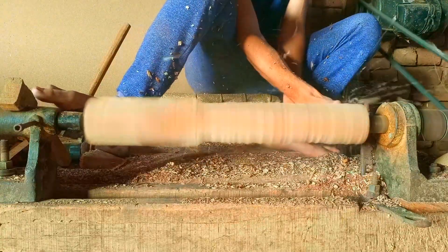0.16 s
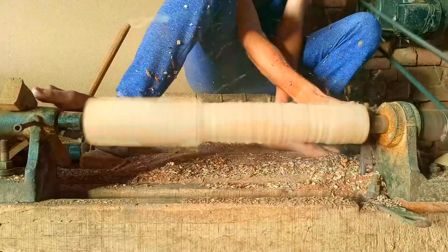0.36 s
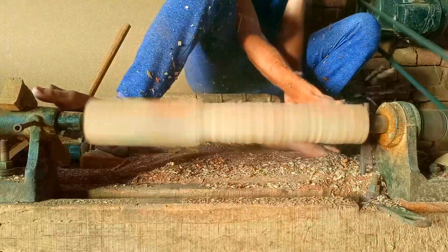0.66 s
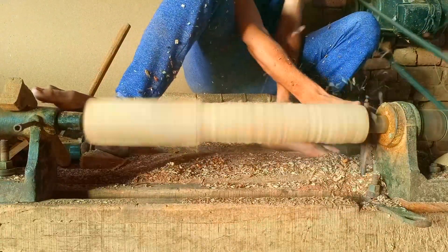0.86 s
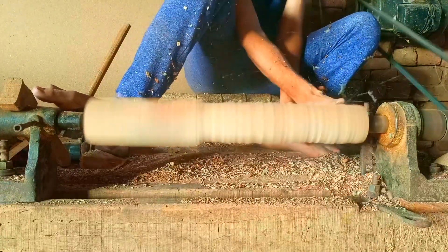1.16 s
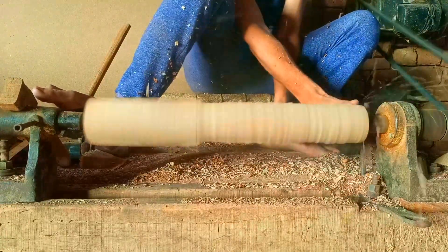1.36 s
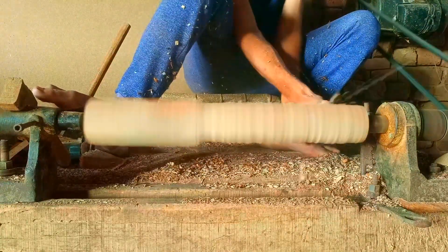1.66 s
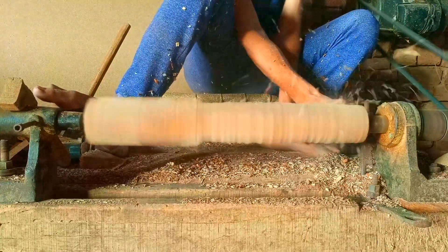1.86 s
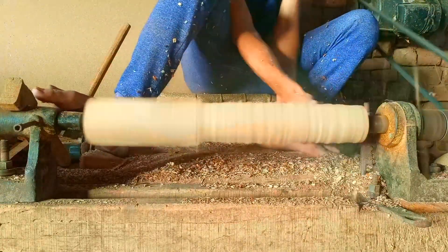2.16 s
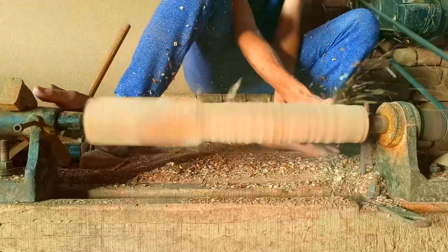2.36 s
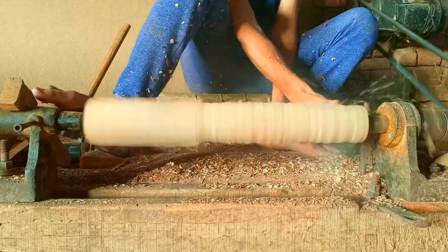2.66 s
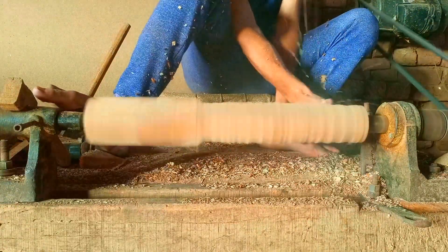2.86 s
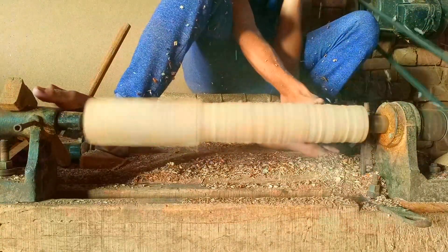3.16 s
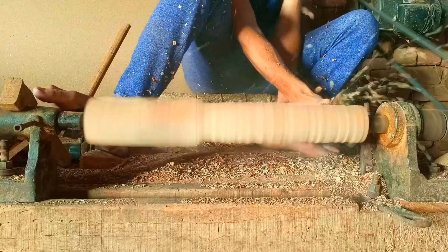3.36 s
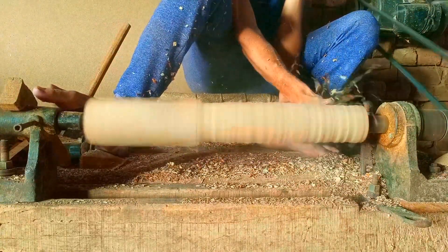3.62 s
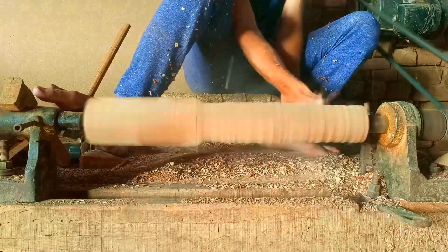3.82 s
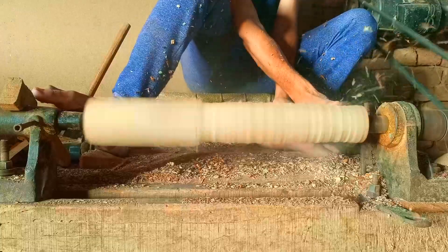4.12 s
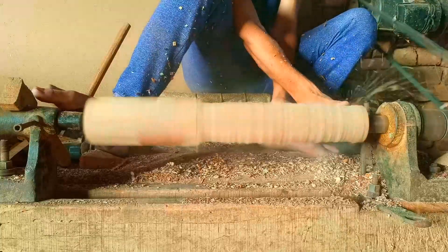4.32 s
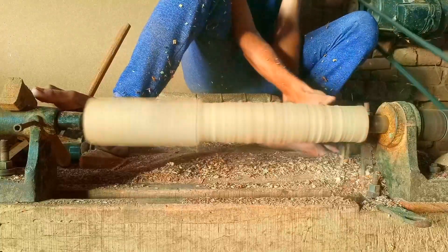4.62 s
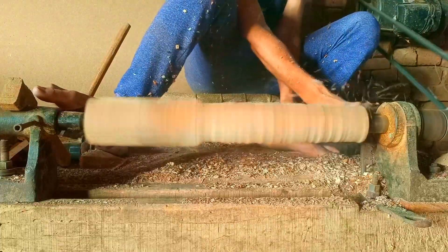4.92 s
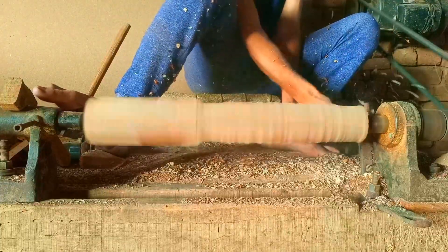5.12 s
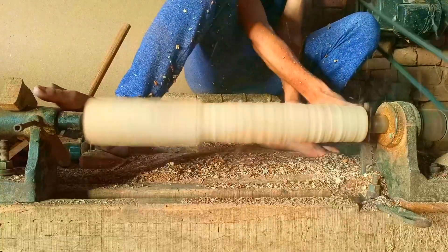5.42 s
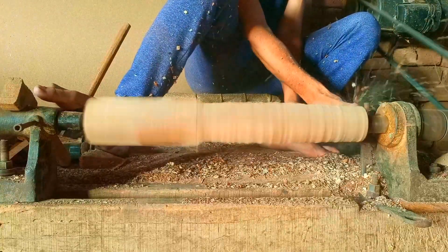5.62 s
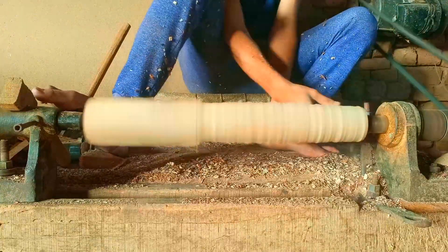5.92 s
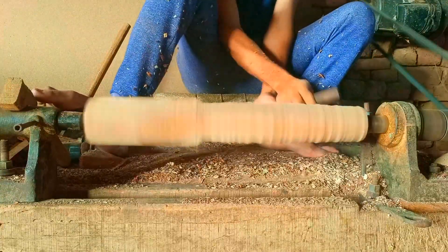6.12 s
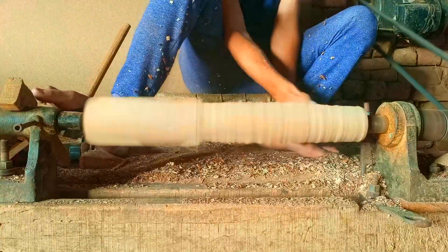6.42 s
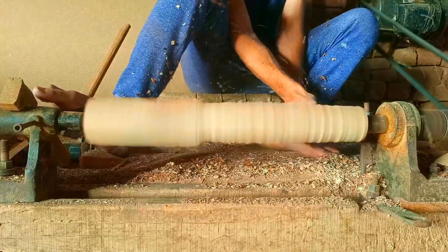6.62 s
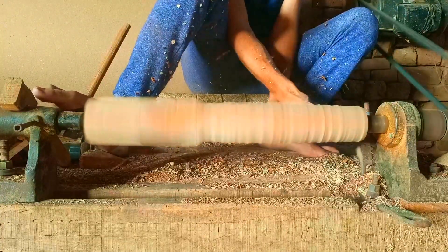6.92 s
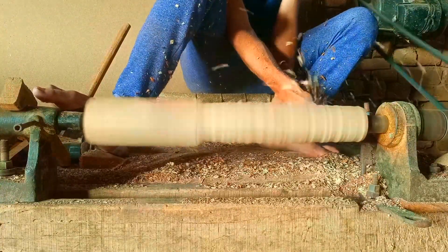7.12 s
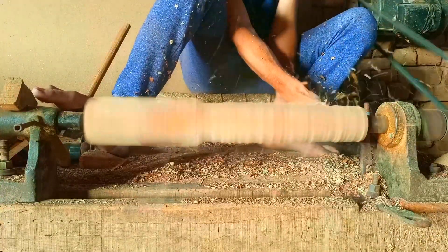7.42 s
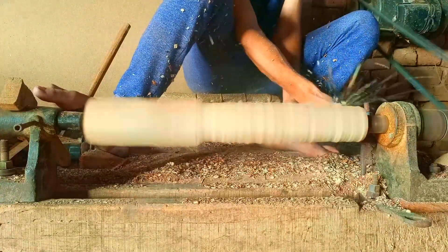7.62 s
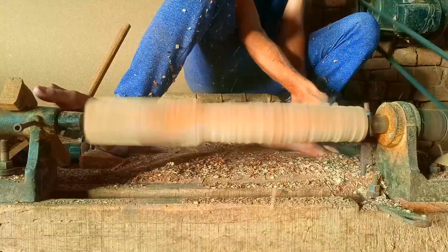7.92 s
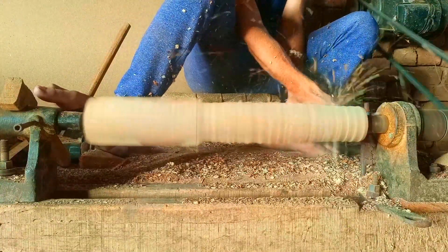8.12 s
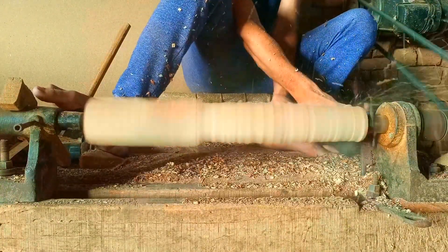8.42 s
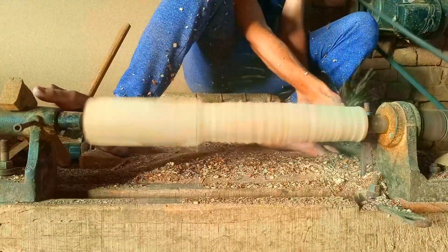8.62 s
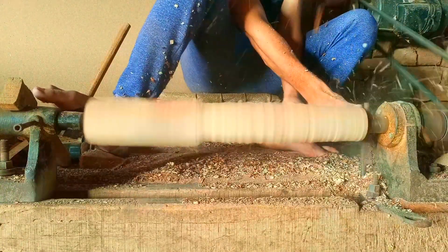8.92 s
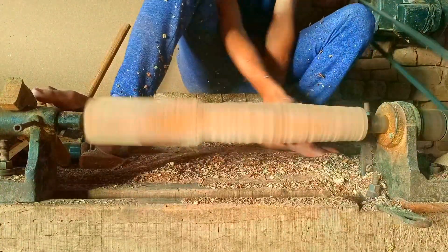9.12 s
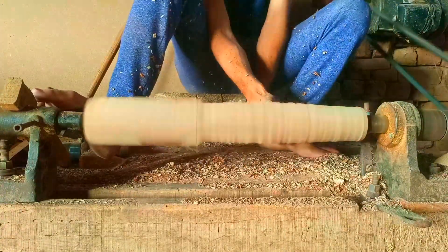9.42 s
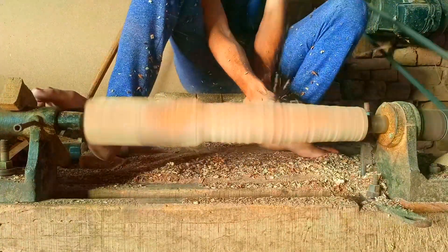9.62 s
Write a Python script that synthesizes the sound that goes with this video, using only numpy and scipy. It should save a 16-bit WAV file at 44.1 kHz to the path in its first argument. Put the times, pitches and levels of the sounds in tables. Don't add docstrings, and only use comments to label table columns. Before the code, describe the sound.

Harsh, fluttering scrapes of a turning tool tear wood on a running lathe, broken by brief pauses of motor hum and bearing ticks.

```python
import sys
import numpy as np
from scipy import signal
from scipy.io import wavfile

SR = 44100
rng = np.random.default_rng(int(sys.argv[2]) if len(sys.argv) > 2 else 0)


def put_to_file(sound):
    columns = np.atleast_2d(sound).T
    safe = np.clip(columns, -1, 1)
    whole_steps = np.round(safe * 32767)
    wavfile.write(sys.argv[1], SR, whole_steps.astype(np.int16))


def level_to_linear(level):
    exponent = np.asarray(level, float) / 20
    return 10 ** exponent


N = 430857

# edge touches t/s, entry force level/dB, cutting time/s, end force level/dB, lifting time/s
STROKES = [(0.092, -36, 0.25, -31, 0.15), (0.581, -32, 0.29, -26, 0.027), (0.966, -27.5, 0.012, -31, 0.025),
           (1.14, -30, 0.22, -36.5, 0.055), (1.712, -34, 0.3, -27, 0.1), (2.279, -33, 0.26, -32, 0.23),
           (3.002, -36.5, 0.086, -39.5, 0.099), (3.277, -30, 0.094, -33.5, 0.062),
           (3.561, -33.5, 0.071, -36, 0.13), (3.873, -37, 0.7, -31.5, 0.012),
           (4.811, -30, 0.17, -33, 0.017), (5.229, -47, 0.091, -25.5, 0.021),
           (5.591, -34.5, 0.11, -30, 0.061), (6.513, -43.5, 0.32, -28, 0.057),
           (7.056, -31.5, 0.35, -26, 0.12), (7.591, -55, 0.19, -36, 0.089), (8, -29.5, 0.41, -28.5, 0.12),
           (8.684, -38, 0.19, -25, 0.077), (9.596, -32.5, 0.16, -36.5, 0.093)]
# log ring level/dB, rest ring level/dB, edge hiss level/dB (all re force),
# first bite peak level/dB, its loudest ring f/Hz
HOLDS = [(5, -8.5, -8, -16, 2460), (4.5, -8.5, -5, -19, 2020), (-8, -13, -16, -15, 2500),
         (6.5, -9.5, -7, -40, 3000), (4.5, -8, -3, -17, 2000), (4.5, -9, -5, -13, 2000),
         (4, -14.5, -3, -14, 2300), (7.5, -1.5, 0.5, -22, 2600), (7, 0, 1, -33, 2290),
         (5.5, -8, -4.5, -4, 2760), (1, -15, -4, -14, 1980), (4.5, -10.5, -0.5, -6, 5300),
         (1.5, -8, 1, -13, 4500), (-0.5, -7, -0.5, -7.5, 4350), (1.5, -13, -2, -25, 2560),
         (2.5, -10, -0.5, -32, 2500), (6.5, -9.5, -4.5, -21, 2640), (2.5, -9.5, -1.5, -11.5, 2520),
         (3, -44, 0, -10, 2800)]
# f/Hz, boost level/dB
SINGING_MODES = [(2710, 1), (5540, 5.5), (4500, 7), (4450, 3), (2710, 2), (4450, 3.5), (4450, 5), (1145, 0),
                 (2710, 3), (2710, -1), (5540, 7), (1145, 7), (6600, -0.5), (4500, 1.5), (2710, 6),
                 (6600, 3), (2580, 1), (5540, 5), (2400, 13.5)]
# t/s, peak level/dB, loudest ring f/Hz
BITES = [(0.159, -9, 2750), (0.213, -18, 1950), (0.283, -8, 2710), (0.596, -17, 2700), (0.671, -4.5, 2710),
         (0.747, -26, 1950), (1.28, -16, 2710), (1.3492, -8.5, 4450), (1.733, -14, 2020), (1.795, -8, 2370),
         (1.8726, -16.5, 2320), (0.476, -19, 4100), (3.057, -9.5, 4450), (2.35, -36, 2710),
         (3.446, -27, 2710), (3.713, -18, 4500), (4.025, -9, 2020), (4.235, -16, 2720), (4.325, -25, 4450),
         (4.7683, -8.5, 2100), (5.6673, -7, 1985), (6.746, -10.5, 1970), (6.88, -7, 2580),
         (7.1387, -12, 2300), (7.46, -14, 2620), (7.756, -4.5, 4600), (5.735, -19, 4500),
         (7.522, -39, 4500), (8.947, -16, 5530), (9.75, -4, 2470)]
# first t/s, last t/s, bites (count), peak level/dB, loudest ring f/Hz
CHATTER = [(0.789, 0.839, 2, -19, 2720), (2.43, 2.523, 3, -9.5, 1980), (2.8858, 2.946, 2, 0, 2800),
           (2.08, 2.1044, 2, -11, 4900), (3.312, 3.37, 2, -17, 2800), (9.6153, 9.7053, 3, -5, 1640),
           (3.604, 3.6454, 2, -5, 2290), (3.922, 3.964, 2, -10.5, 2720), (4.072, 4.123, 3, -8.5, 2710),
           (4.415, 4.464, 3, -12, 2100), (4.2, 6.397, 2, -27.5, 2710), (6.6593, 6.686, 2, -17, 4570),
           (6.788, 6.9, 2, -22, 7100), (7.23, 7.252, 2, -22, 2200), (7.6, 7.676, 3, -6, 2570),
           (8.042, 8.066, 2, -14, 2550), (8.174, 8.2055, 2, -9, 2750), (8.3469, 8.4003, 3, -25, 2360),
           (8.715, 13, 2, -10.5, 2700), (8.628, 8.655, 2, -19.5, 4280), (5.4, 3.4, 2, -32, 6600),
           (0.37, 0.26, 2, -9, 2700)]
# f/Hz, width/Hz, level/dB
CUTTING_MODES = [(574, 55, -19.5), (895.4, 49, -12.5), (1142.7, 38, -1.5), (1263, 68, -4.5),
                 (1950, 65, -13), (2010, 192, 1), (2357, 104, -0.5), (2505, 132, -3), (2710, 117, 1.5),
                 (3322, 68, -12), (3866, 110, -9.5), (4450, 181, -3.5), (4723, 180, -8.5), (5050, 500, -11),
                 (5527, 185, -8.5), (6250, 145, -12)]
# f/Hz, width/Hz, level/dB
BROAD_RASP = [(810, 260, -31), (1527, 230, -13.5), (2300, 1440, -16), (3430, 340, -18.5),
              (5113, 2800, -30.5), (9500, 1100, -100), (15700, 3800, -31.5)]
# f/Hz, width/Hz
BLADE_MODES = [(6600, 260), (7580, 120), (8790, 120), (9150, 250), (11300, 170), (12900, 500)]
BLADE_DB = [-9.5, -30.5, -19, -26.5, -24.5, -59]
# t/s, peak level/dB, contact time/s, bite into the wood level/dB, its loudest ring f/Hz
TAPS = [
    (0.9743, -19, 0.0064, -42, 2370),
    (1.53, -24, 0.0058, -37, 2300),
    (5.112, -23, 0.0068, 1, 1950),
    (5.4821, -15, 0.0077, -5, 2710),
    (6.0826, -16.5, 0.012, -26, 2400),
    (6.2127, -12, 0.013, -12.5, 1990),
    (6.342, -23, 0.0032, -20, 2640),
]
# f/Hz, level/dB, t60/s
FREE_TOOL = [(814, -8.5, 0.11), (1255, -10, 0.22), (1924, 7.5, 0.025), (2315, 6.5, 0.066),
             (3760, -0.5, 0.048), (4170, 7.5, 0.041), (4720, -1.5, 0.035), (5100, -9.5, 0.037),
             (5260, -3, 0.027), (5980, -13, 0.069), (7080, -9, 0.05), (8730, -17, 0.039)]
# f/Hz, width/Hz, level/dB
IDLE_MODES = [(57.7, 90, -9), (110.6, 18.5, -10), (250, 570, -19), (405.5, 29, -7.5), (717, 89, -16),
              (1250, 360, -11), (1703, 63, 3.5), (1794, 38, 5.5), (2300, 270, -8), (2640, 250, -3),
              (4725, 1700, -24), (6000, 1100, -27.5), (9300, 6200, -32.5), (14800, 1300, -39)]
# f/Hz, width/Hz
WHISTLES = [(11300, 90), (15300, 150), (15700, 150)]
WHISTLE_DB = [-25, -19, -32]
# f/Hz, width/Hz, level/dB
TICK_MODES = [(2460, 330, -5), (2720, 124, -3.5), (4000, 1450, -24.5), (6040, 570, -35)]
# t/s, dying time/s, thrown air level/dB, shaken bed level/dB
GUSTS = [(0.7, 0.33, -60.5, -50.5), (1.2, 0.1, -52, -36), (1.85, 0.41, -51, -44), (2.42, 0.62, -54, -47),
         (3.29, 0.2, -56, -40.5), (3.62, 0.17, -47, -46), (4.0, 0.53, -48.5, -43), (4.44, 0.071, -47, -35),
         (4.85, 0.05, -60, -36.5), (6.73, 0.25, -35, -36), (6.82, 0.13, -37.5, -36),
         (7.78, 0.079, -45.5, -60), (9.7, 0.55, -41.5, -46)]

TURNS_PER_S = 17.7
ENTRY_S, ENTRY_DB, LIFT_DB, CLEAR_S, CLEAR_DB = 0.015, 28, 22, 0.072, 36.5
MEAN_FORCE_DB = -32
LOG_LAG, REST_LAG, EDGE_LAG = 0.26, 0.05, 0.29
REST_GAIN_DB, LOG_LOSS_DB, EDGE_LOSS_DB = 1.5, 2, 3


def gouge():
    force_db, log_db, rest_db, edge_db = stroke_curves()
    grain_hz = 2 * TURNS_PER_S * (1 + 0.0723 * drift(2.346))
    grain = np.cos(2 * np.pi * np.cumsum(grain_hz) / SR)
    rasp_db = force_db + 17.5 + 0.78 * grain + 0.99 * drift(36.0) + 6.45 * np.tanh(1.05 * drift(85))

    bite_s, peak_db, ring_hz = np.transpose(all_bites())
    starts = ((bite_s - 0.002) * SR).astype(int)
    shape = bite_shape()
    modes = CUTTING_MODES + BROAD_RASP + [(*mode, db) for mode, db in zip(BLADE_MODES, BLADE_DB)]
    luck = rng.standard_normal((len(starts), len(modes)))
    fibre_db = 4.49 * np.minimum(rng.exponential(1, N), 4) - 7.5
    fibres = rng.standard_normal((2, N)) * level_to_linear(fibre_db)

    out = np.zeros(N)
    for k, (hz, width_hz, level_db) in enumerate(modes):
        in_rest, in_log, in_edge = hz <= 1600, 1600 < hz < 3100, hz > 5000
        part_db = in_log * (log_db - 8.5) + in_rest * (rest_db + 6.5) + in_edge * (edge_db - 0.5)
        grip_db = 7.86 * np.tanh(0.5 * drift(5.9) + 0.55 * drift(44))
        force = level_to_linear(rasp_db + part_db + grip_db + singing_db(hz))
        near_db = 12.7 * np.exp(-(np.log(ring_hz / hz) / 0.033) ** 2)
        bites = level_to_linear(peak_db + 4 + near_db - 3.1 * in_log - 2.3 * in_rest + 3.55 * luck[:, k])
        for start, size in zip(starts, bites):
            force[start:start + len(shape)] += size * shape[:N - start]
        out += level_to_linear(level_db) * resonate(fibres[k % 2] * force, hz, width_hz)
    return out


def stroke_curves():
    t = np.arange(N) / SR
    curves = np.zeros((4, N))
    curves[0] = -120
    for stroke, (log_db, rest_db, edge_db, *_) in zip(STROKES, HOLDS):
        touch, entry_db, cut_s, ease_db, lift_s = stroke
        clear = touch + cut_s + lift_s
        corner_s = [touch - ENTRY_S, touch, touch + cut_s, clear, clear + CLEAR_S]
        lifted_db = ease_db - LIFT_DB
        corner_db = [entry_db - ENTRY_DB, entry_db, ease_db, lifted_db, lifted_db - CLEAR_DB]
        on = (t >= corner_s[0]) & (t <= corner_s[-1])
        force_db = np.interp(t[on], corner_s, corner_db)
        slack_db = MEAN_FORCE_DB - force_db
        done = np.interp(t[on], [touch, clear], [-1, 1])
        curves[:, on] = [force_db,
                         log_db + LOG_LAG * slack_db - LOG_LOSS_DB * done,
                         rest_db + REST_LAG * slack_db + REST_GAIN_DB * done,
                         edge_db + EDGE_LAG * slack_db - EDGE_LOSS_DB * done]
    return curves


def singing_db(hz):
    out = np.zeros(N)
    for (touch, _, cut_s, _, lift_s), (sing_hz, boost_db) in zip(STROKES, SINGING_MODES):
        span = out[int(touch * SR):int((touch + cut_s + lift_s + CLEAR_S) * SR)]
        nearness = np.exp(-(np.log(sing_hz / hz) / 0.041) ** 2)
        span[:] = boost_db * np.linspace(0.6, 1.6, len(span)) * nearness
    return out


def all_bites():
    entries = [(stroke[0], *hold[3:]) for stroke, hold in zip(STROKES, HOLDS)]
    knocks = [(tap[0], *tap[3:]) for tap in TAPS]
    bounces = []
    for first, last, count, db, hz in CHATTER:
        bounces += [(s, db, hz) for s in np.linspace(first, last, round(count))]
    return entries + knocks + bounces + BITES


def bite_shape(rise_s=0.0012, tear_s=0.0047):
    t = np.arange(int(0.05 * SR)) / SR
    return (1 - np.exp(-t / rise_s)) ** 2 * np.exp(-(t / tear_s) ** 0.74)


def taps():
    out = np.zeros(N)
    t = np.arange(int(0.2 * SR)) / SR
    luck = rng.standard_normal((len(TAPS), len(FREE_TOOL)))
    for (s, peak_db, contact_s, *_), chances in zip(TAPS, luck):
        grit = rng.standard_normal(len(t)) * np.exp(-t / contact_s) / np.sqrt(SR * contact_s)
        ring = np.zeros(len(t))
        for (hz, db, t60_s), chance in zip(FREE_TOOL, chances):
            ring += level_to_linear(db + 5.8 * chance - 60 * t / t60_s) * np.sin(2 * np.pi * hz * t)
        ring *= 1 - np.exp(-t / 0.00015)
        at = int(s * SR)
        out[at:at + len(t)] += level_to_linear(peak_db - 11.5) * signal.oaconvolve(grit, ring)[:len(t)]
    return out


def workshop(x, t60_s=0.077):
    t = np.arange(int(0.3 * SR)) / SR
    tail = rng.standard_normal(len(t)) * level_to_linear(-60 * t / t60_s) * (t > 0.004)
    tail /= np.sqrt(np.sum(tail ** 2))
    return signal.lfilter([0.5], [1, -0.5], signal.oaconvolve(x, tail)[:N])


def idling(level_db=-43.5):
    white = rng.standard_normal((2, N))
    modes = IDLE_MODES + [(*mode, db) for mode, db in zip(WHISTLES, WHISTLE_DB)]
    total = np.zeros(N)
    for k, (hz, width_hz, db) in enumerate(modes):
        waver_db = (2.08 + 3.43 * (hz < 500)) * drift(9.5)
        total += level_to_linear(db + waver_db) * resonate(white[k % 2], hz, width_hz)
    return level_to_linear(level_db) * total / total.std()


def bearing_ticks(level_db=-23):
    count = int(N / SR * 36)
    luck = rng.standard_normal((count, 2))
    at = ((np.arange(count) + 0.176 * luck[:, 0]) * SR / (2 * TURNS_PER_S)).astype(int)
    clicks = np.zeros(N)
    clicks[np.clip(at, 0, N - 1)] = level_to_linear(level_db + 10.6 * np.tanh(0.68 * luck[:, 1]))
    drive = rng.standard_normal(N) * burst(clicks, rise_s=0.0003, fall_s=0.003)
    return sum(level_to_linear(db) * resonate(drive, hz, width_hz) for hz, width_hz, db in TICK_MODES)


def draught():
    air_db, bed_db = gusts()
    white = rng.standard_normal(N)
    air = resonate(white, 219, 125)
    bed = level_to_linear(2 * drift(14) - 0.5) * resonate(white, 396, 163) + resonate(white, 584, 154)
    air_db = air_db - 1.5 + 14.1 * np.tanh(0.47 * drift(31))
    bed_db = bed_db - 3 + 7.4 * np.tanh(1.6 * drift(25.4))
    return level_to_linear(air_db) * air / air.std() + level_to_linear(bed_db) * bed / bed.std()


def gusts(calm_air_db=-63.5, calm_bed_db=-56, rise_share=0.53):
    t = np.arange(N) / SR
    air_db, bed_db = calm_air_db, calm_bed_db
    for s, dying_s, gust_air_db, gust_bed_db in GUSTS:
        loss_db = 20 * np.maximum(t - s, (s - t) / rise_share) / dying_s
        air_db = np.maximum(air_db, gust_air_db - loss_db)
        bed_db = np.maximum(bed_db, gust_bed_db - loss_db)
    return air_db, bed_db


def drift(rate):
    r = np.exp(-32 * np.pi * rate / SR)
    noise = rng.standard_normal(N // 16 + 2002)
    slow = signal.lfilter([1], [1, -2 * r, r * r], noise)[2000:]
    return np.interp(np.arange(N) / 16, np.arange(len(slow)), slow / slow.std())


def resonate(x, hz, width_hz):
    r = np.exp(-1.55 * np.pi * width_hz / SR)
    section = [(1 - r * r) / 2, 0, (r * r - 1) / 2, 1, -2 * r * np.cos(2 * np.pi * hz / SR), r * r]
    return signal.sosfilt([section, section], x)


def burst(clicks, rise_s, fall_s):
    a, b = np.exp(-1 / (rise_s * SR)), np.exp(-1 / (fall_s * SR))
    rise = [2 * (1 - a) ** 2, 0, 0, 1, -2 * a, a * a]
    fall = [1, 0, 0, 1, -b, 0]
    return signal.sosfilt([rise, fall], clicks + 1e-18)


def scene():
    cut = gouge() + taps()
    lathe = idling() + bearing_ticks()
    return (cut + level_to_linear(-16) * workshop(cut) + lathe + draught())[None]


def low_pass(x):
    return signal.sosfilt(signal.butter(12, 16820, fs=SR, output="sos"), x)


def record(dry):
    rounded = 0.5 * np.tanh(dry / 0.5)
    heard = signal.sosfilt(signal.butter(1, 40, "high", fs=SR, output="sos"), rounded)
    for dip_hz in (8000, 10100, 12200, 13700):
        band = signal.butter(1, [dip_hz - 350, dip_hz + 350], "band", fs=SR, output="sos")
        heard = heard - 0.76 * signal.sosfilt(band, heard)
    heard = signal.sosfilt(signal.ellip(12, 0.5, 70, 15800, fs=SR, output="sos"), heard)
    return low_pass(heard)


dry = scene()
out = record(dry)
put_to_file(out)
```